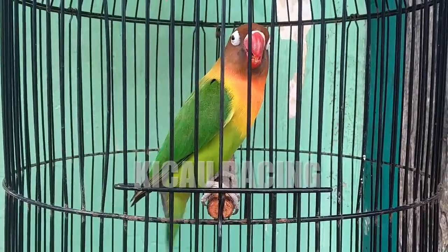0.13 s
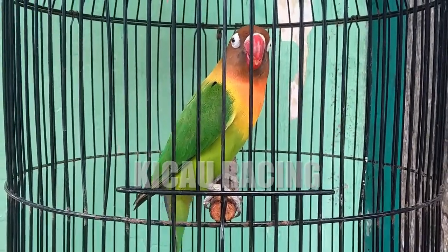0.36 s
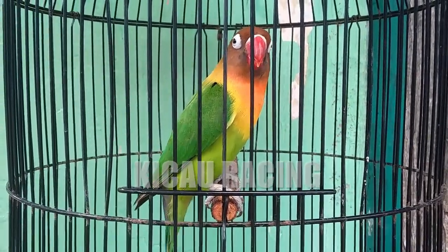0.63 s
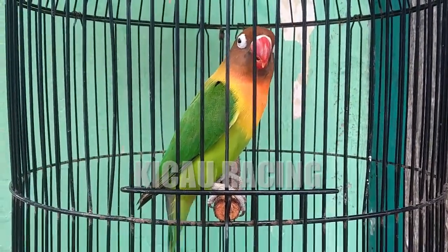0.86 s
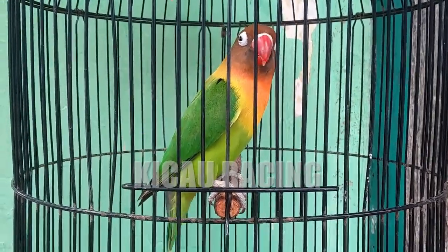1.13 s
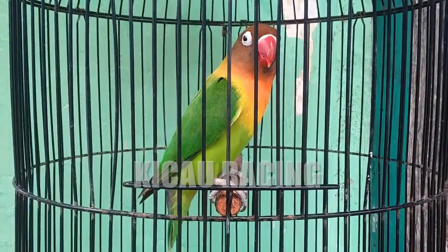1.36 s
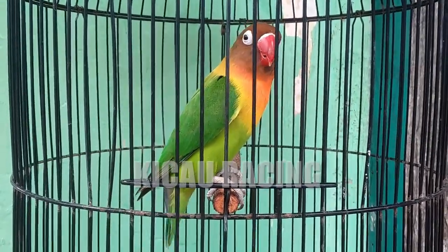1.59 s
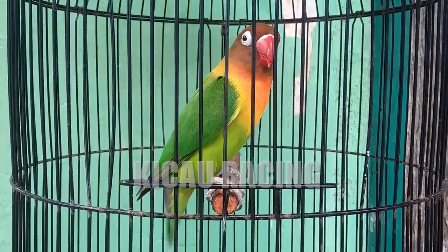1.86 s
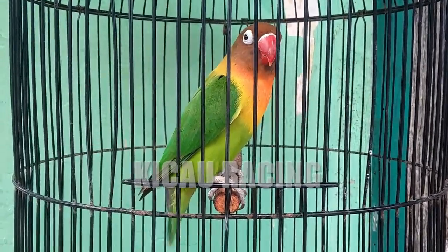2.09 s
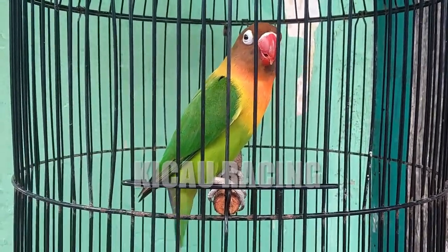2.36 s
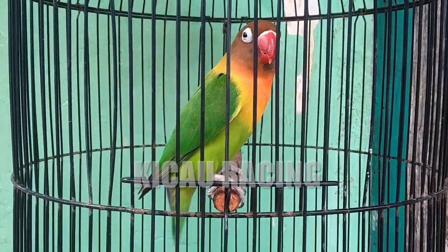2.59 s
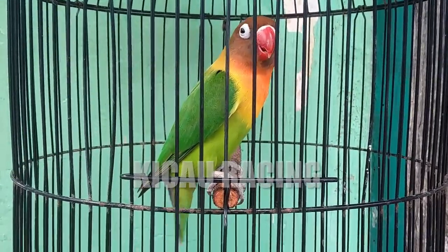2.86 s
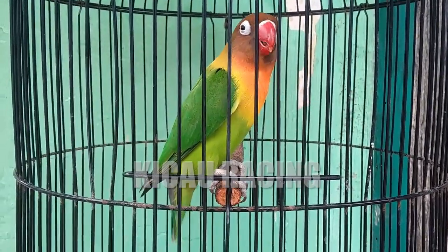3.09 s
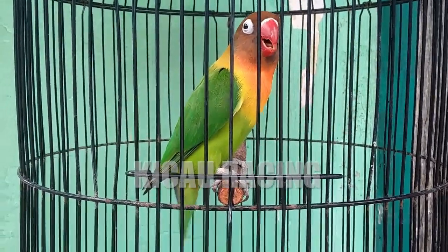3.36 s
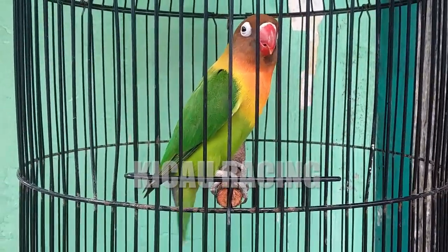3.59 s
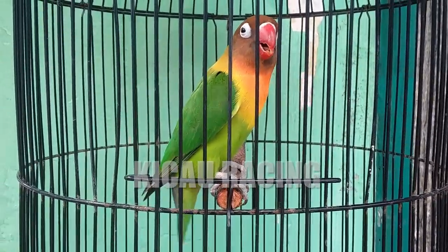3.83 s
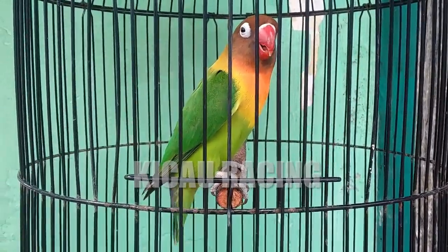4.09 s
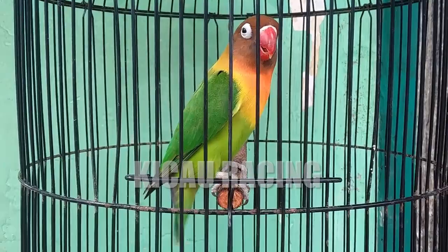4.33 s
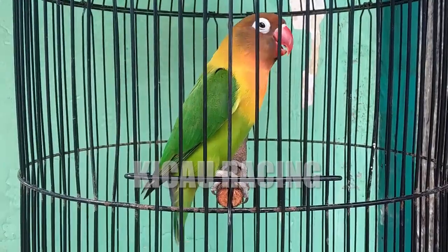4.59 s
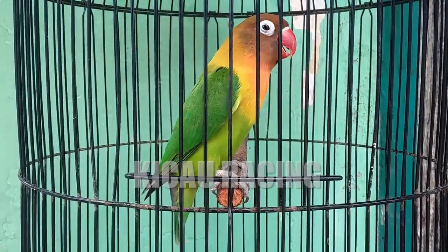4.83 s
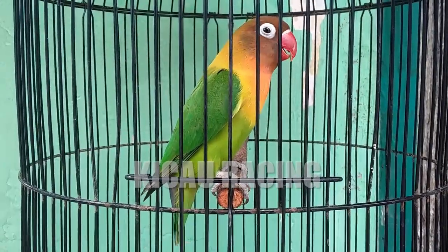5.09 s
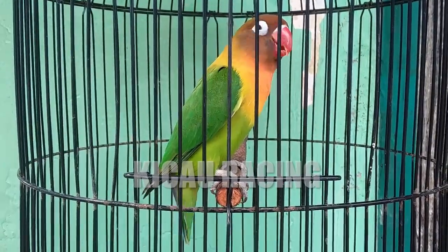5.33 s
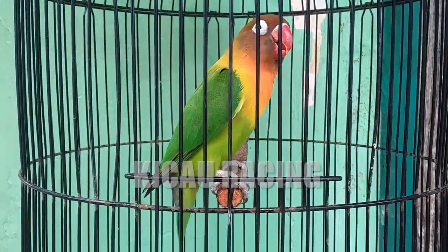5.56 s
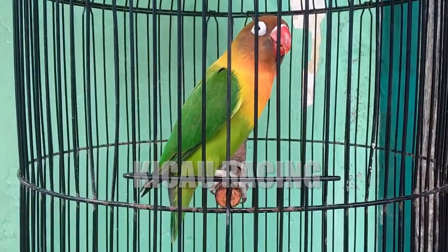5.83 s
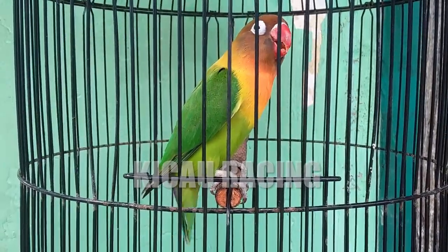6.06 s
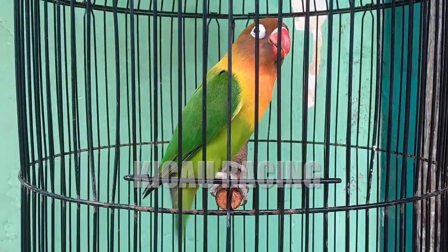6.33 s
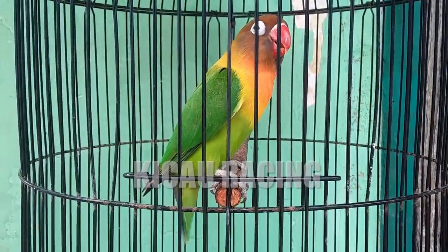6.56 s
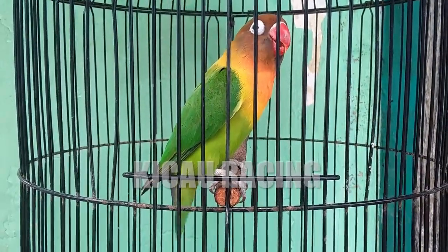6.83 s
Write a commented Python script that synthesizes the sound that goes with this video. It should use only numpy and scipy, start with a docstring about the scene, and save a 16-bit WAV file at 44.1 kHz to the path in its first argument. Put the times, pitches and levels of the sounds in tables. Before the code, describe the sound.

Close, shrill lovebird chirps repeat about eight times a second, drop to quiet beak-like ticking, then return louder and sharper to the end.

```python
"""Fast rasping chirps open at once: a small caged parrot, close to a phone in a hard-walled yard.
Runs of gliding chirps follow, then soft ticks, then loud chirps again to the end.
One membrane sings through windpipe and open beak, as a few gliding overtones; the beak clicks as noise bursts.
A far bird whistles thin sines; filtered noise makes the wind on the microphone and the steady yard air."""
import sys
import numpy as np
from scipy import signal
from scipy.fft import rfft, irfft, next_fast_len
from scipy.io import wavfile
from scipy.ndimage import uniform_filter1d, minimum_filter1d

SR = 44100
rng = np.random.default_rng(int(sys.argv[2]) if len(sys.argv) > 2 else 0)


def to_linear_factor(level_db):
    """Convert decibel levels (scalar or array-like) to linear amplitude factors."""
    exponent = np.asarray(level_db, float) / 20
    return 10 ** exponent


def transcribe(signal):
    """Save signal, clipped to [-1, 1], as a 16-bit WAV file at the path in sys.argv[1]."""
    frames = np.atleast_2d(signal).T
    limited = np.clip(frames, -1, 1)
    pcm = np.round(limited * 32767).astype(np.int16)
    wavfile.write(sys.argv[1], SR, pcm)


N = 306054  # samples in the scene

# Call shapes, a row a note: length_ms (before stretch), start_pitch and end_pitch (ratio to the call's pitch),
# start_level_db and end_level_db (re the call's level), roughness (0-1)
RASP = [(10, .8, .8, -9, -7.5, .2), (9, 1.2, 1., -5, -4, .98), (17, .97, 1.05, -4, -11, .9)]
ARCH = [(12, .73, .96, -14, -6, .05), (10, .96, 1.01, -6, -2, .05), (12, 1.01, .92, -2, -4, .08),
        (7, 1.7, 1.6, -4, -5, .5)]
RISE = [(7, .5, .54, -11, -8, .12), (5, .58, .8, -8, -10, .4), (15.5, .975, 1.04, -6.5, -2, .14),
        (5.5, .79, .74, -7, -6, .8), (12, 1.11, 1.04, -1.5, -11, .5)]
DOUBLE = [(15, .44, .65, -9.5, -9, .12), (13, .91, 1.07, -.5, -1, .4), (7, 1.07, .92, -1, -4, .45),
          (7, .7, .47, -14, -18, .55), (12, .47, .65, -16, -7, .45), (8, .96, .99, -4, -10, .35)]
ARCH_FALL = [(8, 1., .8, -17, -16, .4), (7, .8, 1., -14, -10, .08), (14, 1.01, 1., -9, -6, .08),
             (17, 1.85, 1.58, -9, -1.5, .35), (15, .8, .88, -16, -11, .35), (10, 1.72, 1.75, -3, -5, .2)]
TICK = [(2.5, .95, 1., -3, -.5, .33), (4, 1., 1.03, -.5, -11, .3)]
SLIDE = [(13, 1.5, 1.12, -6, -13, .5), (8, 1.1, .99, -15, -1, .1), (13, .96, .92, -8, -15, .15)]
FALL = [(5, 2.12, 2.05, .5, -2, .1), (9, 1.38, 1.08, -11, -14, .4), (8, 1.08, .99, -10, -3, .17),
        (15, .97, 1.01, -10, -14, .25)]
HOOK = [(4, 1.56, 1.72, -1, -2, .15), (8, 1.73, 1.74, -2, -1, .25), (17, .88, 1.01, -13, -11, .1),
        (12, 1.01, 1.01, -12, -16, .1)]
TURN = [(9, .82, .68, -7, -14, .25), (5, .52, .53, -7, -6, .4), (10, 1.05, .94, -2, -6, .2),
        (5, .96, .99, -8, -12, .3)]
SNAP = [(3.5, .53, .62, -14, -9.5, .25), (4.5, .9, .93, -3.5, -7, .4), (5, 1.1, 1.01, -5, -3, .15),
        (15, 1., .99, -3, -12, .27)]
# The song, a row a group: shape, low_step_db (overtone step of low notes), calls;
# each call: start_s, level_db (relative), pitch_hz, and where given stretch (ratio), held_ms (longer opening)
SONG = [(RASP, .6, [(-.067, -1, 2500, .97), (.049, -2.5, 2764, .9), (.153, -2.5, 2820, 1.01),
        (.267, -3, 2778, .83), (.385, -3.5, 2762, .9)]), (ARCH, 1.5, [(.505, -1, 2793)]),
        (RISE, -9.5, [(.622, -1.5, 4000, 1.05), (.742, -.5, 3847, 1.1), (.856, .4, 3800, 1.05),
        (.973, -.5, 3806, 1.02), (1.090, .9, 3810, 1.03), (1.210, .9, 3880, 1.15), (1.340, -.5, 3867, 1.03),
        (1.453, -1.5, 3850, 1.02), (1.573, .1, 3887, 1.01), (1.693, -.5, 3840, 1.05),
        (1.809, .4, 3890, 1.05), (1.934, -.5, 3907, 1.07), (2.045, .4, 3885, 1.05), (2.161, .1, 3890, 1.1),
        (2.283, .1, 3890, 1.08), (2.402, -.5, 3880, 1.05), (2.518, -1, 3825, 1.08), (2.652, .4, 3823, 1.08),
        (2.772, -.5, 3877, 1.05)]), (DOUBLE, -2.5, [(2.887, .1, 4725, .97), (3.027, -.5, 4733, .9),
        (3.316, .1, 4707, .99), (3.462, -1, 4626, 1.01, 1.5), (3.617, -1, 4500, .99, 12),
        (3.770, -1.5, 4680, 1.01), (3.916, .1, 4654, 1.01), (4.109, -.5, 4910, .94)]),
        (ARCH_FALL, -3.5, [(3.164, .1, 2716)]), (TICK, 1.5, [(4.2537, -12.5, 3080), (4.3436, -11.5, 2830),
        (4.4214, -18, 2960), (4.502, -11, 3100), (4.5872, -17.5, 2960), (4.668, -9.5, 3124),
        (4.7517, -17, 2950), (4.8283, -18, 3074), (4.9083, -12.5, 3120), (4.9937, -8, 2707),
        (5.0671, -16, 2800), (5.1506, -12.5, 2560), (5.2416, -9.5, 2556), (5.3288, -12, 2100, 1.6)]),
        (SLIDE, -2.5, [(5.3985, -.5, 2200)]), (FALL, -1.5, [(5.4956, 1.5, 2127, 1.1),
        (5.5959, .9, 2097, .88), (5.6957, .4, 2310, 1.15)]), (HOOK, 6, [(5.8018, .9, 2894, .96),
        (5.9196, -.5, 2900, .96)]), (TURN, .1, [(6.0398, 2.5, 4730)]),
        (SNAP, -4, [(6.1366, 3.5, 4740, 1.05), (6.2255, 3.5, 4810, 1.1), (6.3174, .4, 4720, 1.1, 2.5),
        (6.4116, 3, 4740, 1.1), (6.5167, 3, 4804, .99), (6.6147, 1.5, 4410, 1.1, 5.5),
        (6.7201, 2.1, 4260, 1.05, 3.5), (6.8344, 2.1, 3920, 1.3, 8.5)])]
# Windpipe and open beak as a filter: frequency_hz, gain_db
TRACT_GAIN = [(500, -31.5), (1500, -16), (1900, -14.5), (2600, -7.5), (3400, -1.5), (4000, 0.5),
              (5600, 1.5), (6300, -9), (7000, -22.5), (8500, -33.5), (11000, -36), (14000, -18),
              (16000, -35.5)]
# Air rushing past the membrane, re the voice's swing: frequency_hz, gain_db
BREATH_GAIN = [(400, -53), (1000, -40.5), (1600, -49.5), (3500, -36.5), (7500, -40), (16000, -48)]
# Beak clicks, loudest as the ticking ends: time_s, level_db (relative)
CLICK_LEVEL = [(0, -51), (4.4, -51), (4.9, -40), (5.35, -37), (5.9, -41), (6.9, -48)]
# Far bird's whistles: start_s, length_s, start_hz, end_hz, level_db (at the middle)
FAR_WHISTLES = [(2.022, .048, 2100, 2180, -32), (2.59, .12, 2620, 2750, -33), (4.0, .33, 2480, 2690, -44),
                (5.63, .065, 2553, 2582, -39)]
# Wind level along the scene: time_s, level_db (rms)
WIND_LEVEL = [(0.0, -55), (1.74, -53), (2.43, -45), (2.94, -56), (3.0, -43), (3.17, -33), (3.21, -42),
              (3.61, -53), (4.54, -55), (4.76, -59), (4.81, -39), (4.99, -51), (6.36, -56), (6.49, -44),
              (6.53, -56), (6.94, -53)]
# Wind spectrum: frequency_hz, density_db (per Hz, relative)
WIND_SPECTRUM = [(15, -60), (25, -33.5), (57, -8), (92, -1.5), (183, -8.5), (300, -22), (500, -30),
                 (650, -42), (1100, -120)]
# Yard air spectrum: frequency_hz, density_db (per Hz, relative)
AIR_SPECTRUM = [(120, -44), (200, -6), (456, -10.5), (1020, -7), (1770, -17), (2790, -7), (3680, -6),
                (5500, -13.5), (6610, -20), (15900, -46.5)]
# Echoes of the nearest walls: delay_ms (where the echo begins), level_db (re direct sound)
WALL_ECHOES = [(3.7, -9), (8.5, -17), (20, -18.5), (37, -20.5)]

REGISTER_HZ = 3450  # low notes lie below, high notes above
HIGH_STEP_DB, ROUGH_OPENS_DB = -11, 8  # high notes are nearly pure; roughness brings out overtones
SCOOP_BEND, SCOOP_OPENS_DB = 2.5, 6  # a low note that leads up to a high one climbs ever faster and brightens
JUMP_MS, RELEASE_MS, RELEASE_DB = .8, 4, -24  # smoothing between notes; dying away after the last
LEAD_IN = SR // 10  # samples of room ahead of the scene, for a call already under way
CLICK_LEAD_MS, TICK_CLICK_LEAD_MS = 16.5, 24.5  # the beak clicks this long before a chirp, before a tick
CLICK_SCATTER_DB = 3
WHISTLE_EDGE_DB, FLUTTER_DB = -11, 3.5  # both ends, under the middle; rms flutter
AIR_DB = -55  # rms level
YARD_DB, YARD_T60_S, FAR_DB, FAR_T60_S = -13.5, 0.19, -28.5, 1  # short tail, long tail
UNDERTONE_DB, UNDERTONE_DROP_HZ = -33.5, 3970  # gain and downward shift of a faint copy


def parrot():
    """Every call, through windpipe and beak, with the hiss of the air that drives it."""
    voice = np.zeros(N + LEAD_IN)
    for shape, low_step_db, calls in SONG:
        for start_s, *call in calls:
            add(voice, start_s + LEAD_IN / SR, chirp(shape, low_step_db, *call))
    flow = uniform_filter1d(np.abs(voice), size=60)
    breath = flow * rng.standard_normal(len(voice))
    return colour(voice, TRACT_GAIN) + colour(breath, BREATH_GAIN)


def chirp(shape, low_step_db, db, hz, stretch=1, held_ms=0):
    """The membrane follows a shape; when rough, its swing and pitch shake."""
    t_ms, pitch, level_db, step_db, rough = notes(shape, low_step_db, hz, stretch, held_ms)
    rough = np.clip(rough, 0, 1)

    def chance(top_hz):
        return wobble(top_hz, 4000)[:len(t_ms)]

    # a jump between registers breaks the overtones off
    jump = uniform_filter1d(np.abs(np.gradient(np.log(pitch), t_ms)), size=30)
    step_db = step_db - 60 * np.maximum(jump - .12, 0)
    level_db = level_db + 2.0 * chance(60.)  # no two calls alike
    # the two sides of the membrane beat against each other some 240 times a second
    beat_hz = 240 * (1 + 0.308 * chance(60.))
    beat = np.sin(2 * np.pi * np.cumsum(beat_hz) / SR + 2 * np.pi * rng.random())
    swing = 0.82 * chance(440.0) + 0.56 * beat
    shaken_hz = hz * pitch * (1 + 0.063 * rough * chance(512.0))
    phase = 2 * np.pi * np.cumsum(shaken_hz) / SR
    tone = np.zeros(len(t_ms))
    for k in range(5):
        audible = (k + 1) * hz * pitch < 18000
        tone += to_linear_factor(k * step_db - 3.45 * k * (k - 1)) * np.sin((k + 1) * phase) * audible
    # a rough start opens with a pop of air
    pop = 2.68 * rough[0] * rng.standard_normal(len(t_ms)) * np.exp(-t_ms / 3.6)
    onset = np.minimum(t_ms / 0.33, 1)
    strength = onset * (1 - .5 * rough + 0.92 * rough * swing)
    return to_linear_factor(db + level_db - 2.5) * (strength * tone + pop)


def notes(shape, low_step_db, hz, stretch, held_ms):
    """Join a shape's notes into pitch, level, overtone step and roughness, and let the last one die away."""
    _, _, last_pitch, _, last_db, last_rough = shape[-1]
    release = (RELEASE_MS, last_pitch, last_pitch, last_db, last_db + RELEASE_DB, last_rough)
    ms, start, end, start_db, end_db, rough = np.transpose(shape + [release])
    ms = ms * stretch
    ms[1 + np.argmax(ms[1:])] -= held_ms  # a longer opening shortens the longest later note
    ms[0] += held_ms
    edges = np.append(0, np.cumsum(ms))
    t_ms = np.arange(int(edges[-1] * SR / 1000)) * 1000 / SR
    n = np.searchsorted(edges, t_ms, side="right") - 1  # which note sounds
    u = (t_ms - edges[n]) / ms[n]  # 0 to 1 through that note
    high = hz * (start + end) / 2 > REGISTER_HZ
    leads_up = ~high & np.append(high[1:], False) & (end > start)
    scoop = leads_up[n]
    pitch = start[n] + (end - start)[n] * np.where(scoop, u ** SCOOP_BEND, u)
    level_db = start_db[n] + (end_db - start_db)[n] * u
    low_db = low_step_db + scoop * SCOOP_OPENS_DB * (u - .5)
    step_db = np.where(high[n], HIGH_STEP_DB, low_db) + ROUGH_OPENS_DB * rough[n]
    size = max(int(JUMP_MS * SR / 1000), 1)
    columns = pitch, level_db, step_db, rough[n]
    return t_ms, *(uniform_filter1d(c, size=size, mode="nearest") for c in columns)


def beak():
    """A short dry click of horn just before each call that starts within the scene: decaying noise."""
    out, t = np.zeros(N), np.arange(300) / SR
    for shape, _, calls in SONG:
        lead_ms = TICK_CLICK_LEAD_MS if shape == TICK else CLICK_LEAD_MS
        for start_s, *_ in calls:
            if start_s <= 0:
                continue
            db = np.interp(start_s, *np.transpose(CLICK_LEVEL)) + CLICK_SCATTER_DB * rng.standard_normal()
            click = np.sign(rng.standard_normal(300)) * np.exp(-t / 0.0014)
            add(out, start_s - lead_ms / 1000, to_linear_factor(db) * click)
    horn = [(700, -27), (1300, -3), (2500, -3.5), (5200, -4), (6500, -24.5), (12000, -47.5)]  # (Hz, dB)
    return to_linear_factor(13.5) * colour(out, horn)


def far_bird():
    """Thin gliding sine whistles whose level flutters a little."""
    out = np.zeros(N)
    for start_s, length_s, start_hz, end_hz, db in FAR_WHISTLES:
        u = np.linspace(0, 1, int(length_s * SR))
        edge = np.minimum(np.minimum(u, 1 - u) * length_s / 0.0017, 1)
        glide_hz = end_hz + (start_hz - end_hz) * (1 - u) ** 2
        tone = np.sin(2 * np.pi * np.cumsum(glide_hz) / SR)
        flutter_db = FLUTTER_DB * wobble(50., 16000)[:len(u)]
        level_db = db + WHISTLE_EDGE_DB * (2 * u - 1) ** 2 + flutter_db
        add(out, start_s, np.sqrt(2) * to_linear_factor(level_db) * edge * tone)
    return out


def wind():
    """Low buffeting on the microphone: bass noise whose level rises and falls in gusts."""
    time_s, db = np.transpose(WIND_LEVEL)
    level_db = np.interp(np.arange(N) / SR, time_s, db) + 1.5 * wobble(14.0, N)
    return unit(colour(rng.standard_normal(N), WIND_SPECTRUM)) * to_linear_factor(level_db)


def yard_air():
    """The steady air of the yard: filtered noise that drifts slightly in level."""
    return unit(colour(rng.standard_normal(N), AIR_SPECTRUM)) * to_linear_factor(AIR_DB + 1.1 * wobble(3., N))


def yard(x):
    """Hard walls return a few echoes, a short dense tail and a faint long one."""
    t = np.arange(SR // 2) / SR

    def fade(t60_s):
        return unit(np.exp(-np.log(1000) * t / t60_s)) / np.sqrt(len(t))

    # many small, few strong reflections
    grain = unit(rng.standard_normal(len(t)) * to_linear_factor(3.42 * rng.exponential(size=len(t))))
    tails = to_linear_factor(YARD_DB) * fade(YARD_T60_S) + to_linear_factor(FAR_DB) * fade(FAR_T60_S)
    response = grain * np.minimum(t / 0.002, 1) * tails
    for delay_ms, db in WALL_ECHOES:
        # rough walls spread each echo over a few ms
        spread = unit(rng.standard_normal(130) * np.hanning(130)) / np.sqrt(130)
        add(response, delay_ms / 1000, to_linear_factor(db) * spread)
    response[0] = 1  # the direct sound
    return signal.fftconvolve(x, response)[:len(x)]


def colour(x, points):
    """Filter by (Hz, dB) points joined on a log-frequency axis."""
    hz, db = np.transpose(points)
    size = next_fast_len(len(x))
    log_hz = np.log(np.maximum(np.fft.rfftfreq(size, 1 / SR), 1))
    gain = to_linear_factor(np.interp(log_hz, np.log(hz), db, left=-90))
    return irfft(rfft(x, size) * gain, size)[:len(x)]


def unit(x):
    """Scale to rms 1."""
    return x / np.sqrt(np.mean(x ** 2))


def wobble(top_hz, size):
    """Smooth chance below top_hz, rms 1."""
    lowpass = signal.butter(2, top_hz, fs=SR, output="sos")
    return unit(signal.sosfilt(lowpass, rng.standard_normal(size + 400))[400:])


def add(track, start_s, sound):
    """Mix a sound in at start_s, cut to the track's ends."""
    i = int(round(start_s * SR))
    a, b = max(i, 0), min(i + len(sound), len(track))
    track[a:b] += sound[a - i:b - i]


def scene():
    """Bird and beak ring the yard; the rest arrives as it is."""
    near = yard(parrot())[LEAD_IN:] + yard(beak())
    return (near + far_bird() + wind() + yard_air())[None]


def top_cut(x):
    """Nothing passes above the cut-off."""
    return signal.sosfilt(signal.butter(12, 16060, fs=SR, output="sos"), x)


def record(dry):
    """The microphone drops the deepest bass and bends when loud; a quick limiter and a clip hold full scale."""
    shifted = dry * np.cos(2 * np.pi * UNDERTONE_DROP_HZ * np.arange(N) / SR)
    undertone = signal.sosfilt(signal.butter(4, 2100., fs=SR, output="sos"), shifted)
    bent = dry + to_linear_factor(-34.5) * dry ** 2 - to_linear_factor(-36.5) * dry ** 3
    bass_cut = signal.butter(2, 50., "high", fs=SR, output="sos")
    heard = signal.sosfilt(bass_cut, bent) + to_linear_factor(UNDERTONE_DB) * undertone
    needed = 1 / np.maximum(np.abs(heard) / 1.11, 1)  # peaks above 1.11 are turned down
    gain = uniform_filter1d(minimum_filter1d(needed, size=41), size=41)
    return top_cut(np.clip(gain * heard, -1, 1))


dry = scene()
out = record(dry)
transcribe(out)
```